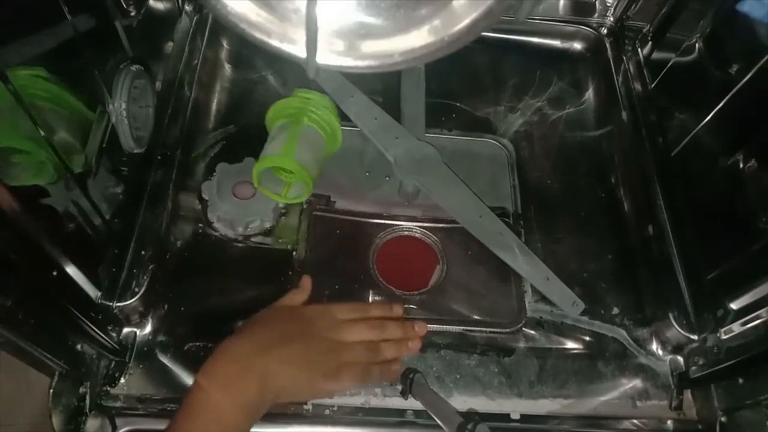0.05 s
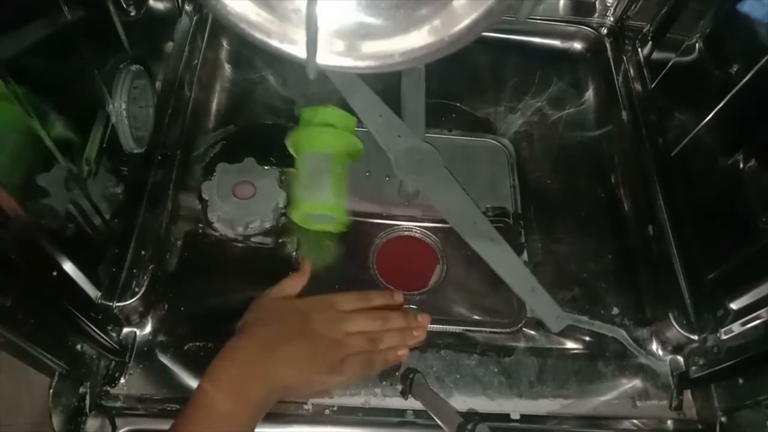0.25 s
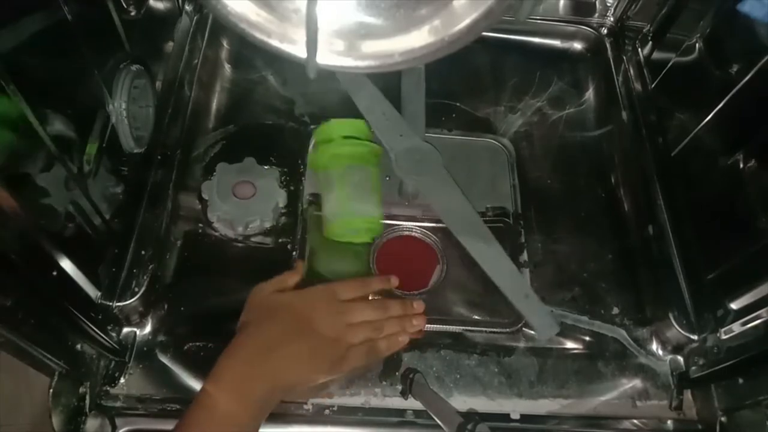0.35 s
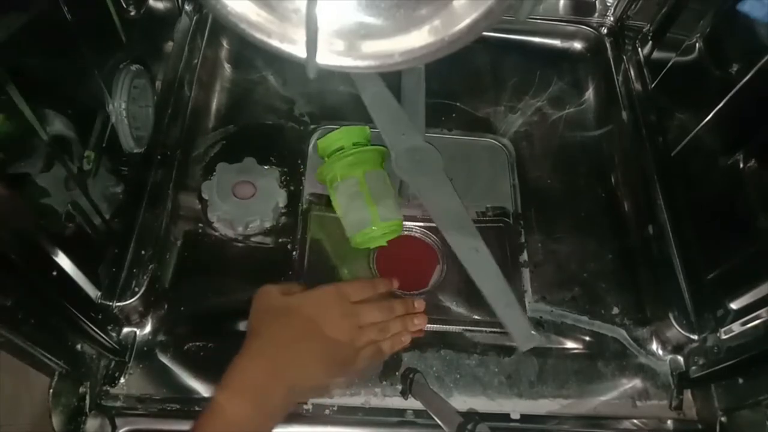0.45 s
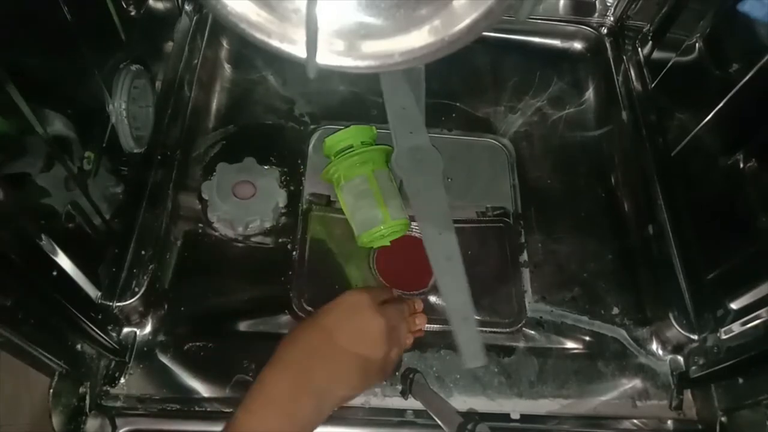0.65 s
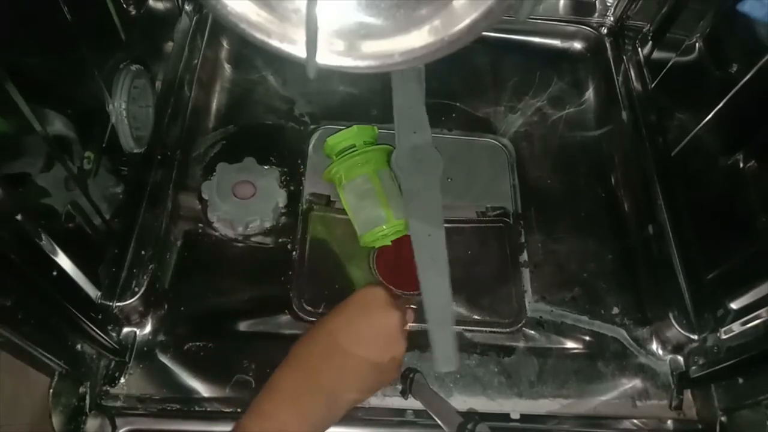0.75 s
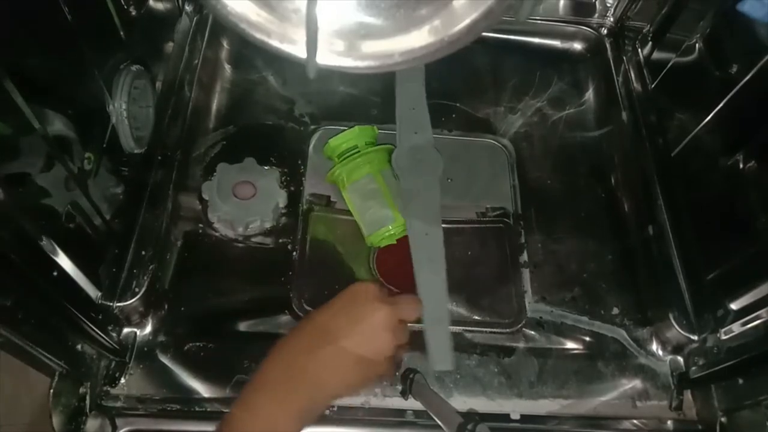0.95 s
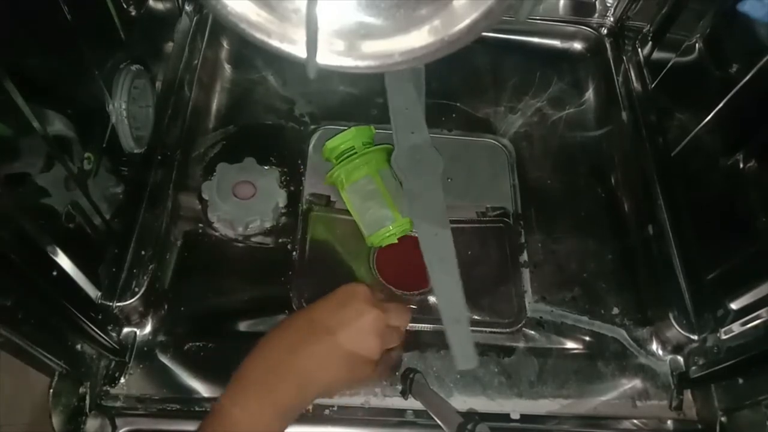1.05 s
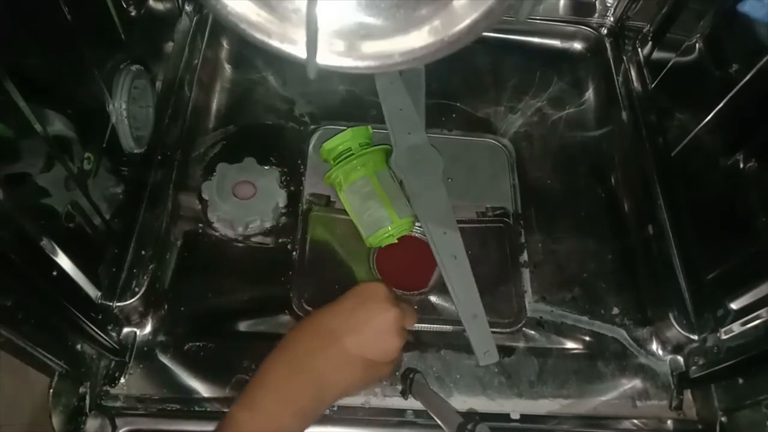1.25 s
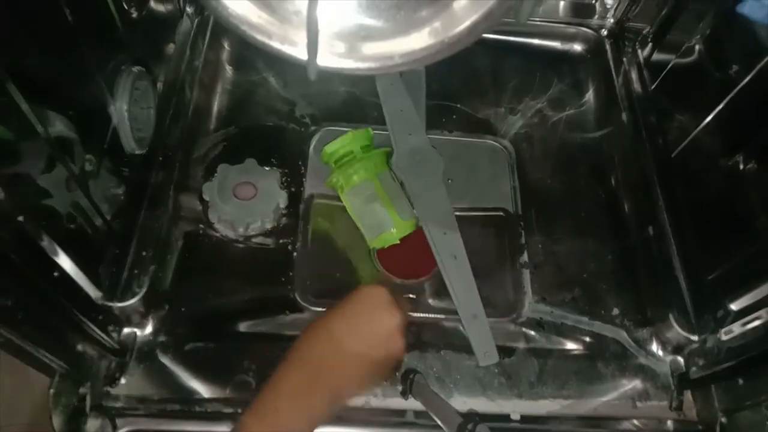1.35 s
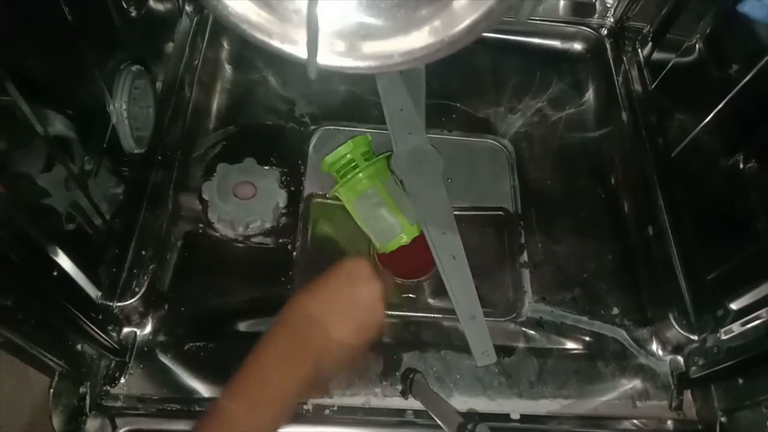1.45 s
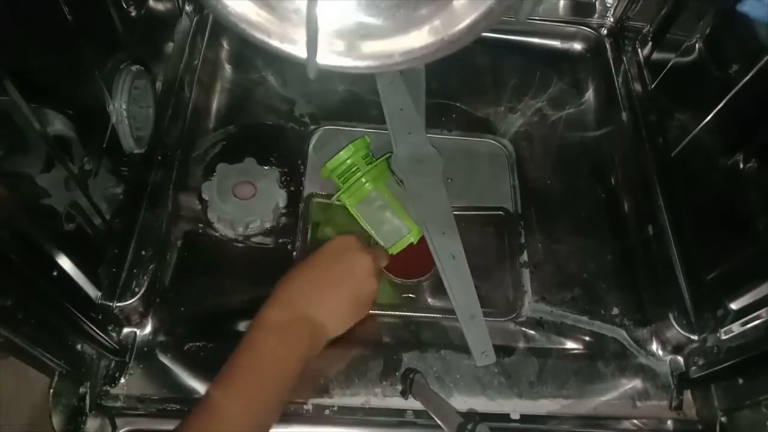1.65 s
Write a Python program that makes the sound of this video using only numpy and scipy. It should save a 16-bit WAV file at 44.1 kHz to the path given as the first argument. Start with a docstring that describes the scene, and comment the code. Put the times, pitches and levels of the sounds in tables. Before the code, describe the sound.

Plastic parts knock and bounce on the steel floor of an empty dishwasher, close by, with a hollow booming knock at about 0.25 seconds and lighter taps until 0.5. The spray arm rumbles softly until about one second, with faint scrapes and squeaks. At 1.3 seconds comes the loudest clack, then a short scrape, and the metal walls ring away over faint room hum.

```python
"""An empty dishwasher, one microphone close by at the open door.
A hand works a plastic filter loose in the steel floor: parts knock, bounce and scrape, and squeak faintly.
The tub throws each contact back, its thin floor booms and its walls ring on.
The spray arm rumbles as it is nudged round, over a faint room hum."""
import sys
import numpy as np
from scipy import signal
from scipy.fft import irfft
from scipy.io import wavfile

SR = 44100
rng = np.random.default_rng(int(sys.argv[2]) if len(sys.argv) > 2 else 0)


def output_pcm(signal):
    """Save a mono or channel-first signal as 16-bit PCM at the path in sys.argv[1].

    Samples are clipped to [-1, 1] before scaling.
    """
    pcm = np.clip(np.atleast_2d(signal).T, -1, 1) * 32767
    wavfile.write(sys.argv[1], SR, np.round(pcm).astype(np.int16))


N = 74970

# bands where the steel walls ring more or less strongly: centre_hz, width_hz, lift_db
WALL_BANDS = [(1590, 210, 9.5), (1760, 33, 4), (2580, 150, 3), (2800, 370, 0.5), (3206, 200, 9),
              (4880, 99, 11.5), (5900, 45, -13.5), (6200, 69, -21.5), (5580, 270, 7), (6300, 200, 3.5),
              (6750, 110, 0), (7240, 350, 8.5), (7100, 55, -30.5)]


def knocks():
    """Plastic parts strike and bounce on the steel floor, each hit sounding the whole tub."""
    # start_s, level_db, bass_db, treble_db, top_db, spot_hz, spot_lift_db
    hits = [(0.0792, -31, -4.5, -5, -5.5, 2720, 14.5), (.086, -30, -7.5, -13, -40, 2794, 6),
            (0.2444, -16, -1, 0, -3, 2173, 7), (0.2464, -24.5, -15, 6, -4, 975, 22),
            (0.2515, -22, -2.5, -3.5, 2, 629, 17), (.284, -24.5, 3, -9.5, -7.5, 2300, 3),
            (0.345, -23, 3.5, -3, -5.5, 7370, 9), (.371, -25, 2.5, -33, -24, 1074, 8),
            (.378, -35.5, 3, -7, -13, 1820, 2), (.476, -35, 5, -1.5, -25, 1900, 12.5),
            (.819, -42.5, 2, -6, -19, 2510, 6), (0.826, -46.5, 18, -22, -21, 1800, 12),
            (1.3046, -12, -13, 1, 1.5, 777, 5), (1.3165, -14, -2.5, 3.5, 4.5, 1680, 10),
            (1.3238, -21, 3, 0.5, 2, 823, -2), (1.444, -37.5, -21, 9, 8.5, 7000, -9)]
    out = np.zeros(N)
    for start_s, level_db, *tone in hits:
        add(out, start_s, amp(level_db) * contact_tone(tub(modes_db=1.5), *tone))
    return out


def scrapes(slips_per_s=1500, spread_db=3, edge_s=0.0052):
    """A sliding part catches and slips on the steel in a quick train of tiny knocks."""
    # start_s, length_s, level_db, bass_db, treble_db, top_db, spot_hz, spot_lift_db
    slides = [(0, 0.012, -33, 12.5, -4, -15, 330, 4.5), (0.011, 0.15, -55, 7.5, 3.5, -9, 1750, 8),
              (0.16, 0.028, -45, -16, 0.5, -6, 5500, 5), (0.186, 0.085, -55.5, -6, 4, -2, 1850, -1),
              (0.391, .11, -53.5, 9, 2, -4, 644.4, 22), (0.521, 0.4, -71, 7, 0, -6, 6650, 19),
              (.83, 0.076, -64, 13, -1.5, -11, 1560, 17), (0.901, 0.072, -60, 15.5, 2.5, -1, 1620, 12),
              (0.981, 0.078, -61.5, 2, 10, -12, 10300, 15), (1.109, 0.054, -58, -17, -3, -10, 3240, 16),
              (1.272, 0.027, -31.5, -6, 10, 15.5, 6600, 5), (1.279, 0.021, -27.5, -2.5, 5.5, -2, 6560, 4),
              (1.336, 0.087, -27, 2, -1, 0, 1660, -14), (1.41, 0.063, -37, 1, 0.5, -1.5, 5700, -6),
              (1.459, 0.092, -46.5, 6.5, 0.5, -15, 5960, 5.5), (1.618, 0.094, -81, -12, 6, -6, 7380, 40)]
    out = np.zeros(N)
    for start_s, length_s, level_db, *tone in slides:
        t = np.arange(0, length_s, 1 / SR)
        chance, size, sign = rng.random((3, SR))[:, :len(t)]
        strength = amp(-spread_db * np.log(size + 0.039))  # many weak slips, a few strong
        slips = (chance < slips_per_s / SR) * np.sign(sign - .5) * strength
        stroke = unit(slips) * np.clip(np.minimum(t, length_s - t) / edge_s, 0, 1)
        body = tub(modes_db=2)
        rubbing = signal.fftconvolve(stroke, body / np.linalg.norm(body))
        add(out, start_s, amp(level_db) * contact_tone(rubbing, *tone))
    return out


def contact_tone(x, bass_db, treble_db, top_db, spot_hz, spot_lift_db):
    """Heavy contacts carry more bass, hard ones more treble; each spot favours one resonance."""
    curve = [(80, -0.5), (150, bass_db), (300, bass_db), (620, 0.5), (2900, 0.5),
             (4000, treble_db), (7300, treble_db), (11500, top_db)]
    width_hz = 68 + 0.05 * spot_hz
    return colour(x, curve, [(spot_hz, width_hz, spot_lift_db)])


def tub(modes_db, build_s=0.0014, echo_db=-2, crack_db=1, crack_t60_s=0.022):
    """Each contact gives a short crack of the plastic itself; the tub adds dense reflections, its modes and the
    wall ring."""
    # decay of the reflections: frequency_hz, t60_s
    echo_decay = [(150, 0.25), (600, .17), (2000, 0.11), (6000, 0.11), (14000, 0.11)]
    # spectrum of a clack: frequency_hz, gain_db
    clack_curve = [(30, -15), (70, -11.5), (200, 7), (400, 1), (800, -3), (1400, -2.5), (2000, -2),
                   (3000, -7), (4100, -10.5), (5200, -5), (7100, -4.5), (8200, -15.5), (11000, -17),
                   (15500, -26)]
    # resonances of the tub: pitch_hz, level_db, t60_s
    tub_modes = [(140.3, -12, 0.14), (170.5, -15.5, 0.31), (197.8, -23.5, 0.45), (300, -12, 0.26),
                 (463, -27, 0.37), (495.6, -24.5, 0.36), (633, -25.5, 0.15), (794, -19.5, 0.2),
                 (929, -29.5, 0.19), (1090, -23, 0.27), (1678, -28.5, 0.6), (2320, -20, 0.14),
                 (5650, -39, .2), (6030, -39, .2), (6645, -29, .2)]
    t = np.arange(SR) / SR
    onset = 1 - np.exp(-t / build_s)
    crack = amp(crack_db - 60 * t / crack_t60_s)
    reflections = rng.choice([-1., 1.], SR) * onset * (amp(echo_db) + crack)
    hz, age_s, spectrum = signal.stft(reflections, SR, nperseg=256)
    decay = amp(-60 * age_s / curve_at(echo_decay, hz)[:, None])
    echoes = signal.istft(spectrum * decay, SR)[1][:SR]
    clack = colour(echoes, clack_curve) / np.sqrt(np.mean(amp(curve_at(clack_curve, hz)) ** 2))
    modes = sum(amp(db - 60 * t / t60) * np.sin(2 * np.pi * f * t) for f, db, t60 in tub_modes)
    return clack + (amp(modes_db) * modes + walls()) * onset


def walls(count=400, level_db=-25.5, low_t60_s=0.78, treble_t60_s=0.91):
    """Many thin modes of the steel walls ring on, longest in the treble."""
    # spectrum of the ring: frequency_hz, relative_db
    ring_curve = [(300, -4.5), (700, -3), (1600, -5), (3200, -3), (4300, -13.5), (5000, -3.5), (6200, 7),
                  (7200, -13), (8200, -17), (12000, -30)]
    t = np.arange(SR) / SR
    jitter, phase = rng.random((2, count))
    lowest_hz, highest_hz = ring_curve[0][0], ring_curve[-1][0]
    hz = lowest_hz + (highest_hz - lowest_hz) * (np.arange(count) + jitter) / count
    gain = amp(curve_at(ring_curve, hz) + lift(WALL_BANDS, hz))
    gain /= np.linalg.norm(gain)
    spectrum = np.zeros(SR // 2 + 1, complex)  # one bin per hertz
    spectrum[np.round(hz).astype(int)] = gain * np.exp(2j * np.pi * phase) * SR / np.sqrt(2)
    is_treble = np.arange(len(spectrum)) > 4400
    low = irfft(spectrum * ~is_treble) * amp(-60 * t / low_t60_s)
    treble = irfft(spectrum * is_treble) * amp(-60 * t / treble_t60_s)
    return amp(level_db) * (low + treble)


def near_walls(x, count=14, first_s=.001, span_s=.009, echo_db=-6, low_cut_hz=1000):
    """The nearest walls return the sound within a few milliseconds, which makes it hollow."""
    jitter, sign = rng.random((2, count))
    delay_s = first_s + span_s * (np.arange(count) + jitter) / count
    taps = np.zeros(SR // 20)
    taps[(SR * delay_s).astype(int)] = np.sign(sign - .5) * amp(echo_db) / np.sqrt(count)
    taps = signal.sosfilt(signal.butter(2, low_cut_hz, "high", fs=SR, output="sos"), taps)
    taps[0] = 1  # direct path to the microphone
    return signal.fftconvolve(x, taps / np.linalg.norm(taps))[:N]


def floor_booms():
    """The thin floor drums at a low pitch while a part presses on it, then dies away."""
    # start_s, swell_s, hold_s, t60_s, pitch_hz, level_db
    flexes = [(0, 0.0013, 0.0089, .12, 183.6, -33), (.075, 0.007, 0.015, 0.073, 151.5, -37.5),
              (0.245, 0.027, 0.039, 0.093, 136.3, -15.5), (.35, 0.012, 0.0084, .3, 146, -32.5),
              (.822, 0.032, .14, 0.16, 130.3, -41), (1.297, 0.021, .11, 0.15, 125.6, -28),
              (1.36, 0.024, 0.082, 0.31, 221.6, -33.5), (1.47, 0.033, 0.069, 0.054, 127, -43.5)]
    out, t = np.zeros(N), np.arange(N) / SR
    for start_s, swell_s, hold_s, t60_s, pitch_hz, level_db in flexes:
        fade_db = 60 * np.maximum(t - swell_s - hold_s, 0) / t60_s
        envelope = np.minimum(t / swell_s, 1) * amp(level_db - fade_db)
        drum = np.sqrt(2) * np.sin(2 * np.pi * pitch_hz * t)
        rattle = .15 * noise_band(pitch_hz, width_hz=90)
        add(out, start_s, envelope * (drum + rattle))
    return out


def spray_arm():
    """The bearing of the turning arm shakes the lowest resonances of the tub."""
    # loudness as the arm turns: time_s, level_db
    turning = [(0, -34.5), (.1, -55), (0.169, -36), (.25, -49.5), (.42, -36), (.52, -38), (.66, -43),
               (.78, -47), (.98, -48), (1.07, -65), (1.7, -67)]
    # resonances it shakes: centre_hz, width_hz, relative_db
    resonances = [(89, 7.8, -1), (112, 73, 3)]
    time_s, level_db = np.transpose(turning)
    rumble = unit(sum(amp(db) * noise_band(hz, width_hz) for hz, width_hz, db in resonances))
    return rumble * amp(np.interp(np.arange(N) / SR, time_s, level_db))


def squeaks():
    """Faint fuzzy tones swell and fade as plastic rubs."""
    # start_s, length_s, pitch_hz, level_db
    rubs = [(.47, 0.3, 610, -60), (0.504, 0.25, 1510, -70), (1.035, .13, 911, -57.5),
            (1.118, 0.1, 1616, -58.5)]
    out = np.zeros(N)
    for start_s, length_s, pitch_hz, level_db in rubs:
        t = np.arange(0, length_s, 1 / SR)
        tone = unit(noise_band(pitch_hz, width_hz=95)[:len(t)])
        add(out, start_s, amp(level_db) * np.sin(np.pi * t / length_s) * tone)
    return out


def room_tone(level_db=-62.5):
    """Faint steady hum and hiss of the room, coloured by the tub walls."""
    # frequency_hz, relative_db
    room_curve = [(20, -10), (45, -18), (85, -23), (130, -3), (220, 5), (400, -25), (1000, -8), (1700, -15),
                  (2400, -21), (4100, -28), (6500, -15), (8500, -20), (15500, -46.5)]
    return amp(level_db) * unit(colour(rng.standard_normal(N), room_curve, WALL_BANDS))


def amp(db):
    """Decibels to gain."""
    return 10 ** (np.asarray(db) / 20)


def unit(x):
    """Scales to rms 1."""
    return x / np.sqrt(np.mean(x ** 2) + 1e-20)


def add(mix, start_s, sound):
    """Lays a sound into the mix at start_s."""
    part = mix[max(round(start_s * SR), 0):][:len(sound)]
    part += sound[:len(part)]


def curve_at(curve, hz):
    """Interpolates rows of frequency_hz, value on a log-frequency axis."""
    f, value = np.transpose(curve)
    return np.interp(np.log(hz + 1), np.log(f + 1), value)


def lift(peaks, hz):
    """Gain in dB of bell-shaped peaks and dips, each centre_hz, width_hz, lift_db."""
    return sum(db / (1 + (2 * (hz - f) / width) ** 2) for f, width, db in peaks)


def colour(x, curve, peaks=(), size=4096):
    """Minimum-phase filter: a curve of frequency_hz, gain_db with resonances on top."""
    hz = abs(np.fft.fftfreq(size, 1 / SR))
    log_gain = np.log(amp(curve_at(curve, hz) + lift(peaks, hz)))
    response = np.exp(np.conj(signal.hilbert(log_gain)))
    taps = np.fft.ifft(response).real[:size // 2]
    return signal.fftconvolve(x, taps)[:len(x)]


def noise_band(hz, width_hz):
    """Noise in one steep resonance, rms 1."""
    f = np.fft.rfftfreq(N, 1 / SR)
    white = np.exp(2j * np.pi * rng.random(len(f)))
    return unit(irfft(white / (1 + ((f - hz) / width_hz * 2) ** 4), N))


def scene():
    """All sources in mono, heard from the open door."""
    return (spray_arm() + floor_booms() + squeaks() + near_walls(room_tone() + knocks() + scrapes()))[None]


def record(dry):
    """The recorder cuts off the highest treble."""
    low_pass = signal.firwin(301, cutoff=15800, window=("kaiser", 9), fs=SR)
    return signal.oaconvolve(dry, low_pass[None], "same")


dry = scene()
out = record(dry)
output_pcm(out)
```